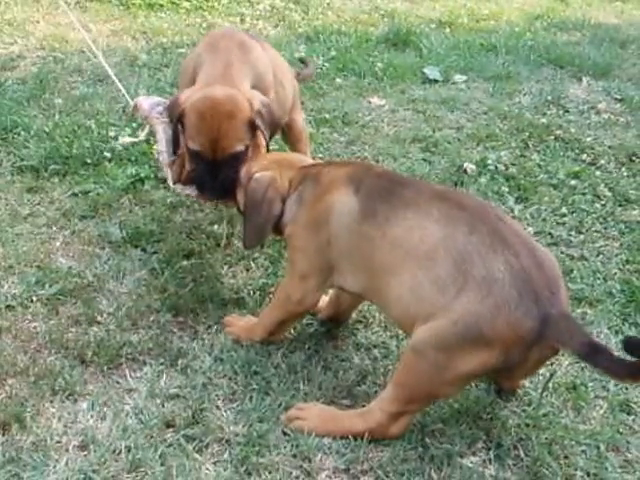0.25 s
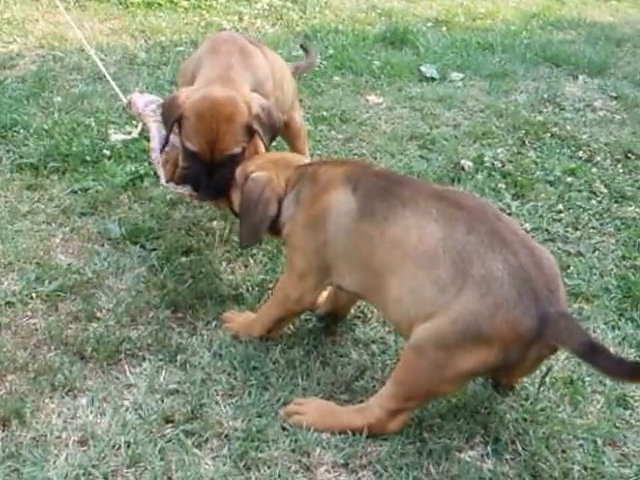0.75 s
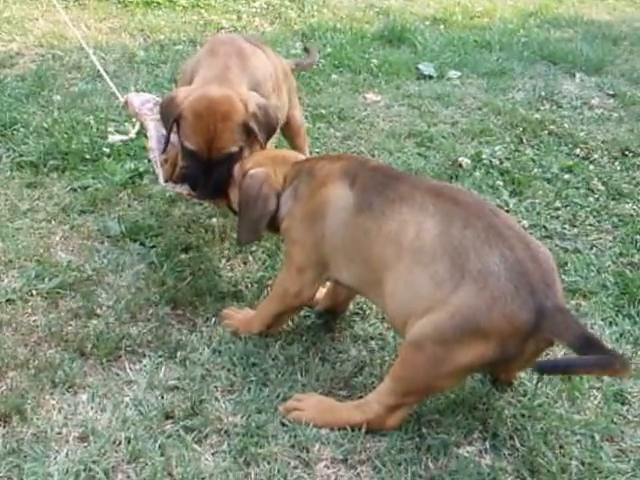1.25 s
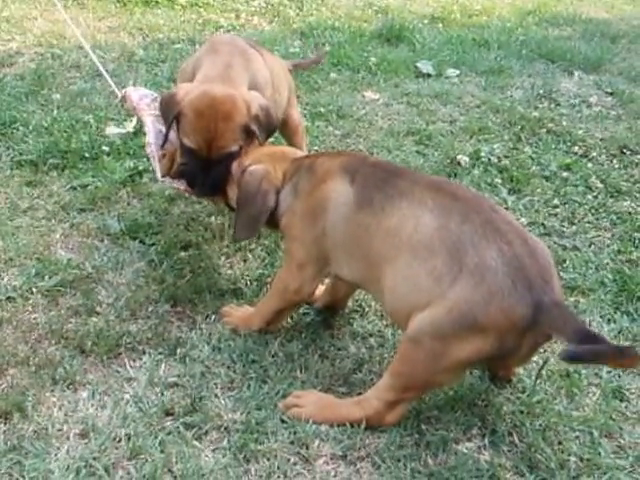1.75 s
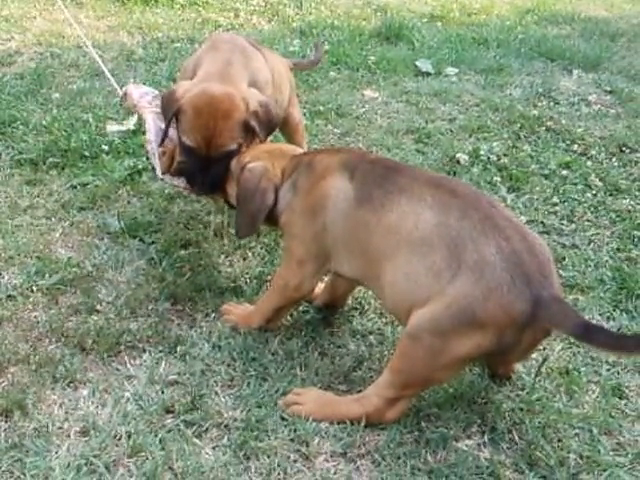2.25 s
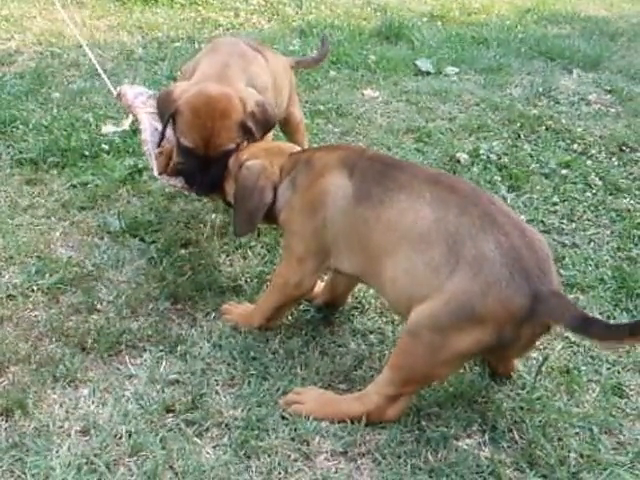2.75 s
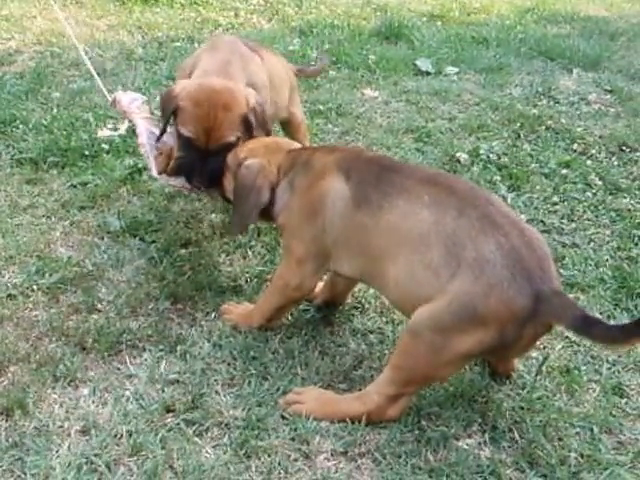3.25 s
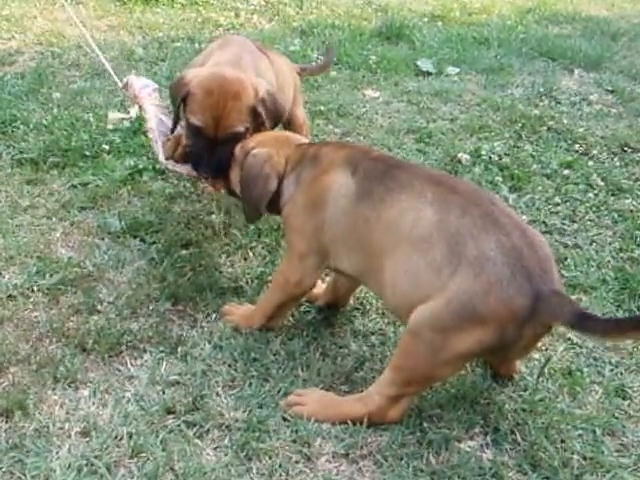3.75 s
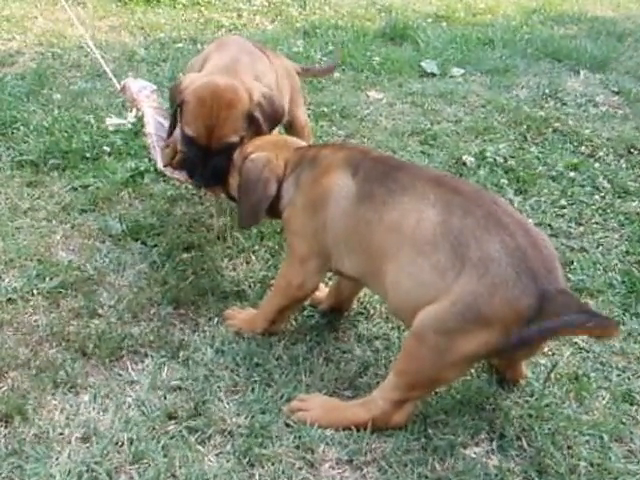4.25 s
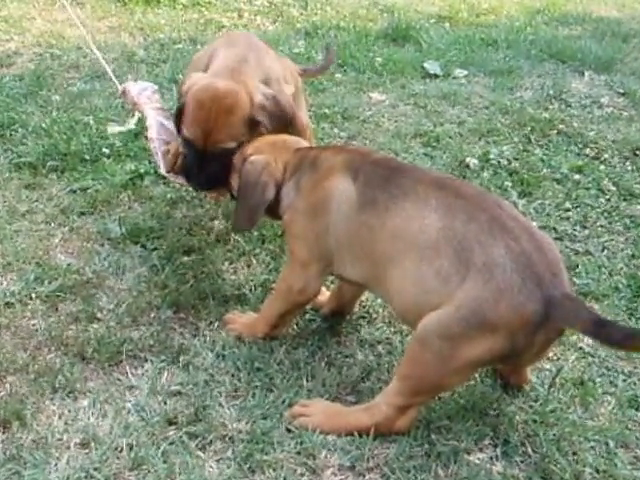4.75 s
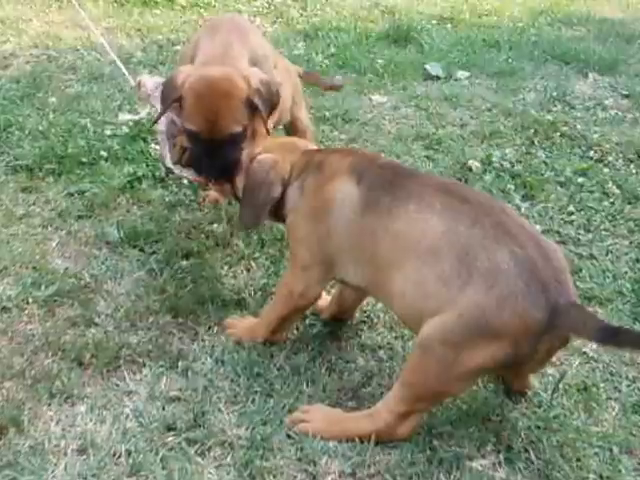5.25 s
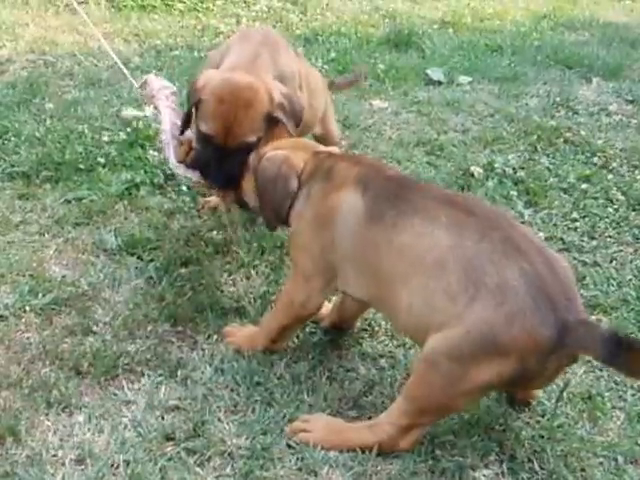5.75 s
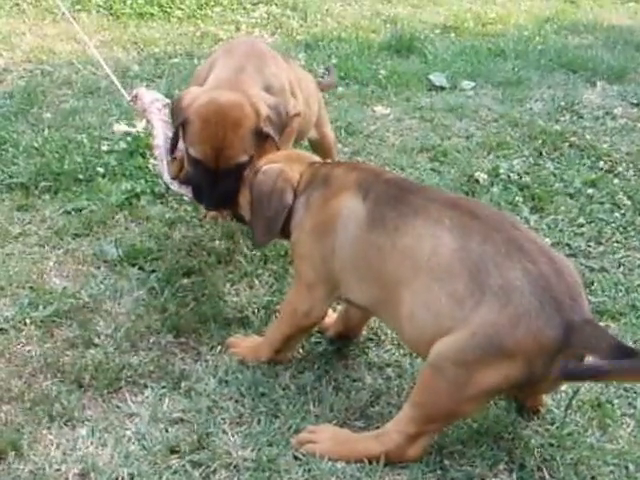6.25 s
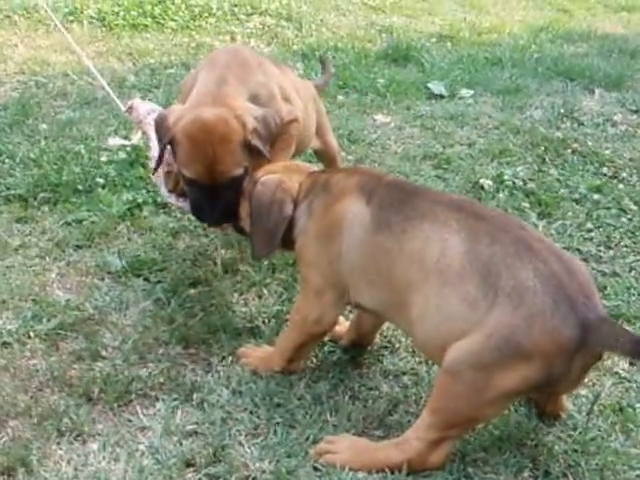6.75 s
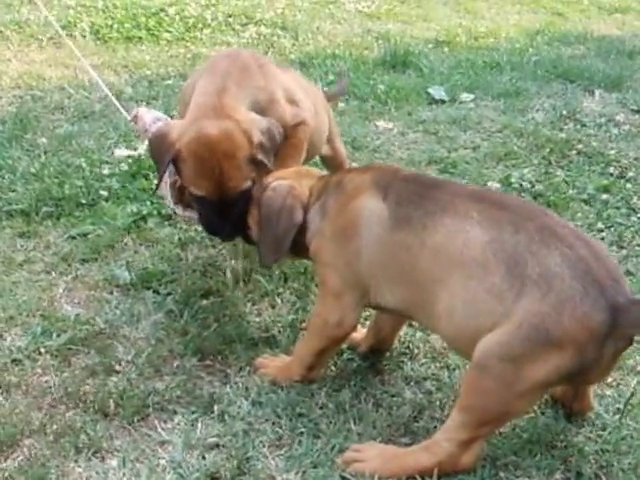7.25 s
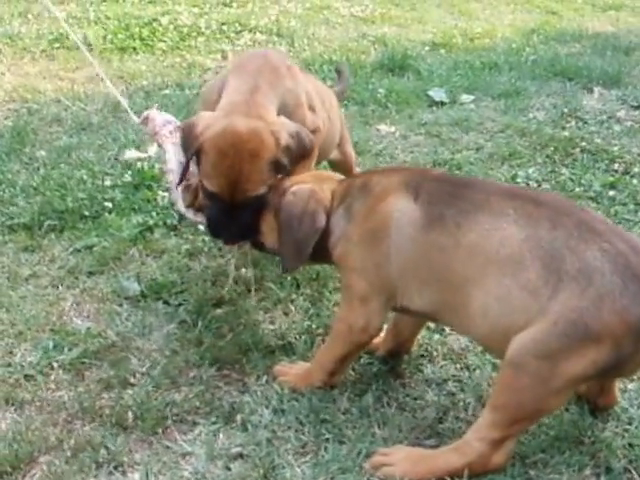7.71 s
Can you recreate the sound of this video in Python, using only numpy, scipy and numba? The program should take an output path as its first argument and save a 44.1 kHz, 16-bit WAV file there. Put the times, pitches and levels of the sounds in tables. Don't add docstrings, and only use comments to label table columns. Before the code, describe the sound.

Constant narrow microphone hiss and a thin high whine lie under two tugging puppies. The closer one gives raspy, throaty growls with a humming chest and ringing jaws, swelling sharply and flipping five times into piercing short yelps. The other grumbles low and crackly between and beneath. After the last yelp comes a quick bark, a growly swell and a final fading growl. Small bird whistles and soft wall echoes place it in open air; loud peaks distort.

```python
import sys
import numpy as np
from scipy import signal
from scipy.fft import rfft, irfft
from scipy.io import wavfile
from scipy.ndimage import uniform_filter1d
from numba import njit

SR = 44100
rng = np.random.default_rng(int(sys.argv[2]) if len(sys.argv) > 2 else 0)


def pcm_store(signal):
    levels = np.round(np.clip(np.atleast_2d(signal), -1, 1) * 32767)
    wavfile.write(sys.argv[1], SR, levels.astype(np.int16).T)


def magnitude_from_level(level_db):
    exponent = np.asarray(level_db, float) / 20
    return 10 ** exponent


N = 351898
T = np.arange(N) / SR

# pitch_hz, level_db (per Hz)
AIR = [(20, -9), (30, -15), (70, -11), (100, -17), (135, -8), (208, -3.5), (379, -9), (726, -13),
       (1700, -13), (4400, -14.5), (5500, -15.5), (6600, -13), (7600, -14), (8300, -27)]
AIR_DB, WIND_DB, GUST_DB = -49.5, -66, 3
# pitch_hz, level_db
WHINE = [(7853, -64), (7882, -64), (8118, -70)]

# start_s, pitch_hz, effort_db, jaw_opening (0-1), roughness (0-1)
FIRST_GROWL = [(0, 140, -35.5, 0.92, 0.51), (.05, 134.1, -39, 0.84, 0.58), (0.189, 154.1, -35.5, .4, 0.38),
               (.3, 178.3, -33, .5, 0.37), (.4, 197.5, -33, .42, 0.31), (.464, 216.3, -29.5, 0.81, 0.28),
               (.56, 199.2, -33, 0.66, 0.4), (0.862, 164, -33.5, 0.74, 0.27), (.92, 153.4, -35, 0.71, 0.59)]
SECOND_GROWL = [(1.575, 172.5, -41.5, 0.19, 0.32), (1.65, 161.7, -40, .1, 0.302),
                (1.79, 156.8, -37.5, 0.34, 0.32), (1.881, 168, -35, 0.64, 0.2),
                (1.93, 175.2, -29.5, .83, 0.24), (2.05, 183.2, -27.5, 0.77, .22),
                (2.16, 178.4, -35.5, 0.47, 0.39), (2.41, 167.7, -32.5, 0.75, 0.17)]
SURGE = [(2.468, 182.9, -27.5, 0.74, 0.072), (2.522, 247.5, -12, .6, 0.075),
         (2.548, 238.3, -25.5, 0.71, 0.099), (2.6, 210, -33.5, 0.63, 0.32),
         (2.705, 156.3, -38.5, 0.79, 0.32)]
THIRD_GROWL = [(3.31, 237.3, -32, .4, .7), (3.355, 232.2, -34, 0.49, 0.68),
               (3.41, 208.1, -42.5, 0.71, 0.47), (3.519, 170.1, -39.5, 0.27, 0.31),
               (3.701, 159, -36.5, 0.51, 0.22), (3.914, 162.7, -32.5, 0.53, .18),
               (3.955, 177.8, -30, 0.96, .05), (3.978, 212.4, -18.5, 0.49, .35)]
TRAIL = [(4.118, 225, -38, 0.97, 0.31), (4.128, 204.9, -43, 0.37, .5)]
GRUNT = [(4.742, 262.2, -45, .5, .5), (4.752, 250.1, -58, 0.67, .55)]
BARK = [(5.645, 175.4, -52, 0.81, .4), (5.73, 168.6, -49, 0.68, 0.31), (5.915, 169.5, -34.5, 0.66, 0.25),
        (5.956, 190.6, -31, 0.91, .15), (6.011, 230.2, -19.5, 0.93, .08), (6.05, 234.8, -19, 0.75, .06),
        (6.062, 205.4, -32, 0.74, .15), (6.085, 182, -34.5, 0.88, 0.27)]
SWELL = [(6.191, 165, -40.5, 0.74, 0.31), (6.47, 159.7, -37, 0.64, .2), (6.505, 167.9, -32.5, 0.63, .15),
         (6.53, 182, -25, .75, .08), (6.565, 190.9, -24.5, 0.85, 0.13), (6.605, 179.7, -26.5, 0.79, 0.18),
         (6.653, 163.9, -36, 0.71, .45)]
LAST_GROWL = [(7.16, 117.9, -38, .85, .1), (7.215, 159.9, -28.5, 0.69, 0.16), (7.255, 173.4, -35, 1, 0.29),
              (7.356, 164.4, -37, 0.74, 0.426), (7.471, 159, -39.5, 0.55, 0.37),
              (7.55, 174.5, -28, 0.91, 0.3), (7.63, 168.4, -35, .6, .22), (7.77, 160, -35, 0.38, .36),
              (7.98, 158.5, -42.5, 0.27, .4)]
ATTACK_S, RELEASE_S, QUIET_DB = .022, .028, -29.5

# pitch_hz, level_db
CHEST = [(130, -3.5), (170, 2), (230, 5.5), (330, -0.5), (500, 5), (600, -5.5), (700, -16.5), (900, -28)]
HUM_DB, HUM_KNEE_HZ, HUM_DB_PER_HZ = -30.5, 183, 0.07
HUM_LOW_HZ, HUM_LOW_DB_PER_HZ = 140, 1

# start_s, pitch_hz
JAW_PATH = [(0, 984), (.13, 920), (.47, 837), (.9, 892), (1.37, 906), (1.91, 850), (2.42, 907),
            (2.5, 922.3), (2.71, 843), (3.15, 872), (3.9, 865), (4.1, 928), (4.62, 1190), (4.73, 870),
            (5.49, 1187), (5.6, 847.3), (5.91, 890), (6.03, 1302),
            (6.09, 978.4), (6.18, 861.6), (6.47, 898), (6.54, 1085), (6.65, 979), (7.15, 919),
            (7.26, 883.5), (7.98, 917.7)]
JAW_SHUT_DB, JAW_SPAN_DB = -25, 31.5

# pitch_hz, width_hz, level_db
MOUTH = [(1419, 64, -5.5), (1843, 440, -9.5), (2424, 142, 3.5)]
# start_s, pitch_hz
MOUTH_PATH = [(0.0, 2270), (0.22, 2318), (0.89, 2500), (1.18, 2400), (2.69, 2388), (4.27, 2462),
              (4.42, 2150), (5.0, 2360), (5.18, 2334), (6.27, 2410), (6.4, 2302), (7.98, 2224)]
GAPE_HZ, GAPE_WIDTH_HZ, GAPE_FULL_DB, GAPE_DB = 1740, 520, -20.5, -9.5

# pitch_hz, width_hz, level_db
TEETH = [(3430, 450, 0), (4600, 480, -.5), (5000, 360, -5), (6500, 900, 8)]
TEETH_DB, TEETH_FOLLOW = -37.5, 0.87

FLAP_DB, FLAP_DECAY, FLAP_SAG = 3.5, .3, .025

# start_s, end_s, first_pitch_hz, peak_effort_db, swell_db
CREAKS = [
    (1.338, 1.413, 100, -17.5, 7.5),
    (3.124, 3.183, 110, -17, 6.5),
    (3.973, 4.02, 203.6, -17.5, -2.5),
    (4.605, 4.632, 220, -19.5, 0.5),
    (5.477, 5.492, 295, -16.5, 16),
]
# chest_db, jaw_db, mouth_db, teeth_db
CREAK_START_DB = (-36.5, -31, -31.5, -50)
# knee_db, end_db
CREAK_JAW_DB = (-6.5, -21)
CREAK_TEETH_DB = (-9.5, 5.5)
CREAK_KNEE, CREAK_TOP_HZ, CREAK_ROUGH = .4, 304.8, .07
CREAK_FADE_S, CREAK_FADE_DB = 0.013, -14.5

# time_after_s, pitch_hz, chest_db, rasp_db, roughness (0-1)
SLACK = [(0, 315, -39, -21, .5), (.023, 268, -27, -33.5, .65), (0.077, 200, -43.5, -48.5, .5)]
SLACK_JAW_DB, SLACK_MID_HZ, SLACK_DB_PER_HZ = -45.5, 884, -0.0241

# delay_s, level_db, smear_s
ECHOES = [(0.1724, -30.5, 0.013), (0.098, -26, 0.09), (.3, -41, 0.031), (0.12, -33.5, 0.0082)]

# time_s (from its start), pitch_hz, level_db
WHISTLE = [(0, 1500, -13), (.01, 2300, -15), (.018, 3200, -9), (.03, 3900, -3), (.045, 4120, 0),
           (.075, 3800, -2), (.11, 3150, -4), (.125, 3000, -20)]
# start_s, level_db, pitch_ratio
BIRD = [(.145, -39, 1.0), (.145, -50, 1.14), (1.125, -41, 1.0), (1.122, -50, 1.14), (1.2, -56, 1.0),
        (5.815, -46, .97), (7.1, -41, .92), (7.1, -43, 1.04)]

# start_s, peak_db
SNAPS = [(1.398, 1), (1.402, 0), (3.165, 1), (3.169, -1), (3.179, 1), (3.988, 2), (3.993, 0), (4.620, -2),
         (4.623, 1), (4.629, 2), (5.487, 0), (6.003, 1), (6.007, 1)]

# start_s, rise_s, hold_s, top_pitch_hz, level_db
YELPS = [
    (1.413, .034, .018, 840, -22),
    (3.178, .044, 0.025, 893, -22),
    (4.014, .027, .016, 822, -21),
    (4.627, .038, .028, 903, -21),
    (5.484, .04, .03, 890, -21),
]
# stage (0 start, 1 top reached, 2 top left, 3 end), pitch_share, level_db, tilt_db_per_octave
ARCH = [(0, .78, 4.5, 1), (0.398, .87, 2.5, 5), (1, 0.99, -0.5, 2), (1.5, 0.98, 1, 2.5), (2, .98, -4, 1.5),
        (2.55, .875, 1.5, 4), (3, .78, -3.5, -2.5), (3.5, .68, -19, -10.5)]
YELP_FALL_S = .026
# pitch_hz, level_db
YELP_MOUTH = [(650, -4.5), (790, -14), (885, 1.5), (1350, -13), (1600, -2.5), (1800, -2.5), (2150, 4.5),
              (2450, 9), (2700, -6.5), (3300, -1), (3700, -6), (4500, -4.5), (5200, -15), (6500, -26)]

# start_s, end_s, pitch_hz, first_db, last_db
MUTTER = [
    (1.55, 2.72, 99.07, -49, -42),
    (2.76, 3.131, 104, -43, -50.5),
    (4.78, 5.465, 97.7, -44.5, -48),
    (6.694, 7.114, 94.1, -56, -48),
    (7.158, 7.976, 98.7, -37, -48),
]
# pitch_hz, width_hz, level_db
MUTTER_THROAT = [(175, 55, -0.5), (525, 38, -0.5), (903, 11, -12), (1517, 160, -11.5), (2140, 140, -27)]


def column(rows, k):
    rows = np.array(sorted(rows))
    return np.interp(T, rows[:, 0], rows[:, k])


def gains(tables, k, edge=0.0047):
    out = np.zeros(N)
    for rows in tables:
        gate = np.clip(np.minimum(T - rows[0][0], rows[-1][0] - T) / edge + 1, 0, 1)
        out += gate * magnitude_from_level(column(rows, k))
    return out


def unit(x, s=0.013):
    return x / np.sqrt(uniform_filter1d(x ** 2, int(s * SR)) + 1e-12)


def walk(rate):
    k = int(SR / rate)
    steps = np.repeat(rng.standard_normal(N // k + 1), k)
    return 1.257 * uniform_filter1d(uniform_filter1d(steps, k), k)[:N]


@njit
def svf(x, hz, width):
    y, b, l = np.empty(len(x)), 0., 0.
    for i in range(len(x)):
        g, k = np.tan(np.pi * hz[i] / SR), width / hz[i]
        v = (b + g * (x[i] - l)) / (1 + g * (g + k))
        b, l, y[i] = 2 * v - b, l + 2 * g * v, k * v
    return y


def band(x, hz, width):
    return svf(x, hz + np.zeros(N), 1. * width)


@njit
def folds(hz, jitter, shimmer, chance):
    pulses, phase, p, k = np.zeros(len(hz) + 1), np.empty(len(hz)), 0., 0
    for i in range(len(hz)):
        step = hz[i] * (1 + jitter[i] * chance[k, 0]) / SR
        p += step
        if p >= 1:
            p, k = p - 1, k + 1
            size = np.exp(shimmer[i] * chance[k, 1])
            pulses[i] += size * p / step
            pulses[i + 1] += size * (1 - p / step)
        phase[i] = p
    return pulses[:-1], phase


def throat(x, modes, shift=1, patchy_db=0, steep=False):
    out = 0
    for k, (hz, width, db) in enumerate(modes):
        ring = band(x, hz * shift, width)
        if steep:
            ring = band(ring, hz * shift, 1.6 * width)
        out = out + (-1) ** k * magnitude_from_level(db + patchy_db * walk(7)) * ring
    return out


def air():
    hz, db = np.transpose(AIR)
    f = np.arange(N // 2 + 1) * SR / N + 1
    colour = magnitude_from_level(np.interp(np.log(f), np.log(hz), db))
    hiss = irfft(rfft(rng.standard_normal(N)) * colour, N)
    hiss *= magnitude_from_level(AIR_DB + 0.41 * walk(3.9)) / hiss.std()
    whine = 0
    for whine_hz, level_db in WHINE:
        tone = np.sqrt(2) * np.sin(2 * np.pi * whine_hz * T + .5 * walk(22))
        whine = whine + magnitude_from_level(level_db + 1.9 * walk(13)) * tone
    gusts = magnitude_from_level(WIND_DB + GUST_DB * walk(5.2))
    wind = gusts * unit(band(rng.standard_normal(N), 30, 30), s=2)
    return hiss + whine + wind


def stage(yelp_row, place):
    start, rise, hold = yelp_row[:3]
    return np.interp(place, range(5), np.cumsum([start, rise, hold, YELP_FALL_S, YELP_FALL_S]))


def layers(s, hz, db, opening, rough):
    high_loss_db = HUM_DB_PER_HZ * max(hz - HUM_KNEE_HZ, 0)
    low_loss_db = HUM_LOW_DB_PER_HZ * max(HUM_LOW_HZ - hz, 0)
    hum_db = HUM_DB - high_loss_db - low_loss_db
    jaw_db = db + JAW_SHUT_DB + JAW_SPAN_DB * opening
    return s, hum_db, jaw_db, db, TEETH_DB + TEETH_FOLLOW * (db + 36)


def faded(row, s):
    return (row[0] + s, *(db + QUIET_DB for db in row[1:]))


def creak_layers(s, hz, db, k):
    hum_db = layers(s, hz, db, 0, 0)[1]
    return s, hum_db, db + CREAK_JAW_DB[k], db, db + CREAK_TEETH_DB[k]


def voice():
    pitch, levels = [], []
    breaths = (FIRST_GROWL, SECOND_GROWL + SURGE, THIRD_GROWL, TRAIL, GRUNT, BARK + SWELL, LAST_GROWL)
    for rows in breaths:
        pitch += [(s, hz, rough) for s, hz, _, _, rough in rows]
        held = [layers(*row) for row in rows]
        levels.append([faded(held[0], -ATTACK_S), *held, faded(held[-1], RELEASE_S)])
    for start, end, hz, db, swell_db in CREAKS:
        knee = start + CREAK_KNEE * (end - start)
        knee_hz = hz * (CREAK_TOP_HZ / hz) ** CREAK_KNEE
        pitch += [(start, hz, CREAK_ROUGH), (knee, knee_hz, CREAK_ROUGH), (end, CREAK_TOP_HZ, CREAK_ROUGH)]
        levels.append([
            (start, *(db + np.array(CREAK_START_DB))),
            creak_layers(knee, knee_hz, db - swell_db, 0),
            creak_layers(end, CREAK_TOP_HZ, db, 1),
            creak_layers(end + CREAK_FADE_S, 2 * CREAK_TOP_HZ, db + CREAK_FADE_DB, 1)])
    for row in YELPS:
        end = stage(row, place=3)
        lift_db = SLACK_DB_PER_HZ * (row[3] - SLACK_MID_HZ)
        pitch += [(end + s, hz, rough) for s, hz, _, _, rough in SLACK[:2]]
        levels.append([(end + s, chest_db + lift_db, SLACK_JAW_DB, db, db) for s, _, chest_db, db, _ in SLACK])
    return pitch, levels


def growl():
    rows, effort = voice()
    hz = column(rows, 1)
    rough = np.clip(column(rows, 2), 0, 1)
    jaw_hz = uniform_filter1d(column(JAW_PATH, 1), 500)

    beat = np.cumsum(24.6 + 1.2 * walk(5)) / SR
    loose = np.clip(1 + .6 * walk(3), 0, 2)
    lips = np.sin(2 * np.pi * beat) * loose
    flap = uniform_filter1d(np.exp(-(beat % 1) / FLAP_DECAY) - FLAP_DECAY, 90) * loose

    chance = rng.standard_normal((6000, 2))
    pulses, phase = folds(hz * (1 + .009 * lips), .055 * rough, .5 * rough, chance)
    puffs = np.exp(-phase / .6) * rng.standard_normal(N)

    wobble_db = 7.0 * rough
    hum = 0
    for k in range(1, 6):
        colour_db = np.interp(k * hz, *np.transpose(CHEST)) + wobble_db * walk(60)
        hum = hum + magnitude_from_level(colour_db) * np.cos(2 * np.pi * k * phase - 0.5 * (k - 1))
    chest_breath = band(band(puffs, 410, 670), 410, 670)
    hum = unit(hum) + 0.55 * rough * unit(chest_breath)

    drive = -pulses + .14 * rough * puffs
    airy = drive + .14 * rough * puffs
    jaw = band(band(drive, jaw_hz, 61), jaw_hz, 730)

    shift = uniform_filter1d(column(MOUTH_PATH, 1), 2000) / MOUTH[-1][0]
    mouth = throat(airy, MOUTH, shift * (1 + FLAP_SAG * flap), patchy_db=1.5)
    gape = np.clip(gains(effort, 3) / magnitude_from_level(GAPE_FULL_DB), 0, 1)
    mouth = mouth - magnitude_from_level(GAPE_DB) * gape * band(drive, GAPE_HZ, GAPE_WIDTH_HZ)
    mouth = band(mouth, 1556, 1100)

    teeth = throat(airy, TEETH, 1 + .018 * walk(5), patchy_db=3.2, steep=True)
    teeth = band(teeth, 2900, 2400)

    rasp = sum(gains(effort, k) * unit(part) for k, part in enumerate((jaw, mouth, teeth), 2))
    return gains(effort, 1) * hum * magnitude_from_level(1.1 * lips) + rasp * magnitude_from_level(FLAP_DB * flap + .9 * walk(40))


def walls(x):
    t, reply = T[:SR // 2], 0
    for s, db, smear in ECHOES:
        shape = np.exp(-((t - s) / smear) ** 2) * rng.standard_normal(len(t))
        reply = reply + magnitude_from_level(db) * shape / np.sqrt(np.sum(shape ** 2))
    far = signal.sosfilt(signal.butter(1, [700, 4000], "band", fs=SR, output="sos"), x)
    return signal.fftconvolve(far, reply)[:N]


def bird():
    out = np.zeros(N)
    for start, db, ratio in BIRD:
        rows = [(start + t, hz, level_db) for t, hz, level_db in WHISTLE]
        hz = ratio * uniform_filter1d(column(rows, 1), 400) * (1 + 0.0067 * walk(250))
        out += magnitude_from_level(db) * gains([rows], 2) * np.sin(2 * np.pi * np.cumsum(hz) / SR)
    return out


def snaps():
    clicks = np.zeros(N)
    for s, db in SNAPS:
        clicks[int(s * SR)] = magnitude_from_level(db + 16.8)
    return band(clicks, 1000, 300) + band(clicks, 2300, 900) + magnitude_from_level(-3.0) * band(clicks, 4000, 2000)


def arches():
    return [[(stage(row, place), row[3] * share, row[4] + db, tilt) for place, share, db, tilt in ARCH]
            for row in YELPS]


def yelp():
    calls = arches()
    rows = sum(calls, [])
    mouth_hz, mouth_db = np.transpose(YELP_MOUTH)
    hz = uniform_filter1d(column(rows, 1), int(0.009 * SR)) * (1 + 0.0029 * walk(300))
    turn = 2 * np.pi * np.cumsum(hz) / SR
    tilt = column(rows, 3)
    stack = 0
    for k in range(1, 9):
        level_db = np.interp(k * hz, mouth_hz, mouth_db) + tilt * np.log2(k / 3)
        stack = stack + magnitude_from_level(level_db) * magnitude_from_level(2.7 * walk(80)) * np.cos(k * turn + np.pi + k * k / 5)
    breath = band(rng.standard_normal(N), 2600, 3000)
    half_pitch = 1 + .13 * np.cos(turn / 2)
    return gains(calls, 2) * (stack * half_pitch + .26 * breath)


def mutter():
    calls = [[(start, hz, db), (end, hz, last_db)] for start, end, hz, db, last_db in MUTTER]
    hz = column(sum(calls, []), 1) * (1 + .05 * walk(4))
    pulses, _ = folds(hz, np.full(N, .05), np.full(N, .4), rng.standard_normal((3000, 2)))
    drive = -pulses + .04 * rng.standard_normal(N)
    return gains(calls, 2, edge=.03) * unit(throat(drive, MUTTER_THROAT), s=.1)


def scene():
    pup = growl() + yelp() + snaps()
    pup = signal.sosfilt(signal.ellip(6, .5, 34, 5150, fs=SR, output="sos"), pup)
    loud = uniform_filter1d(np.abs(pup), int(0.12 * SR))
    background = (bird() + air()) / (1 + 1.4 * loud)
    return (pup + walls(pup) + mutter() + background)[None]


def roll_off(x):
    return signal.sosfilt(signal.butter(12, 15800, fs=SR, output="sos"), x)


def record(dry):
    narrow = signal.sosfilt(signal.ellip(10, .2, 80, 8200, fs=SR, output="sos"), dry)
    mix = np.clip(narrow - .0034, -1, 1)
    return roll_off(mix)


dry = scene()
out = record(dry)
pcm_store(out)
```